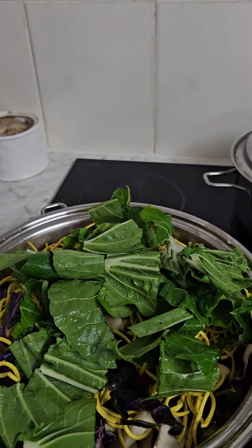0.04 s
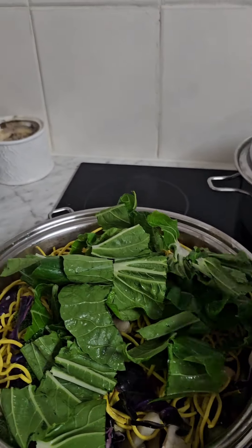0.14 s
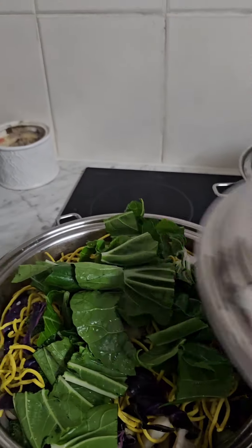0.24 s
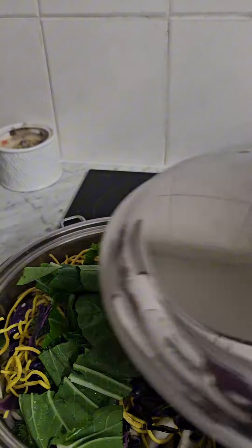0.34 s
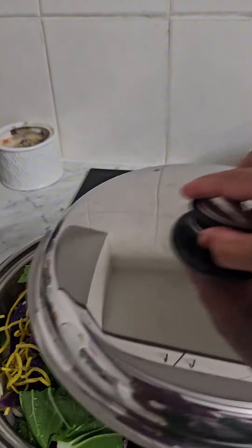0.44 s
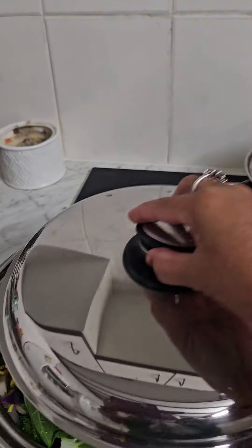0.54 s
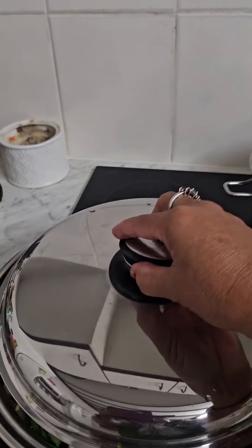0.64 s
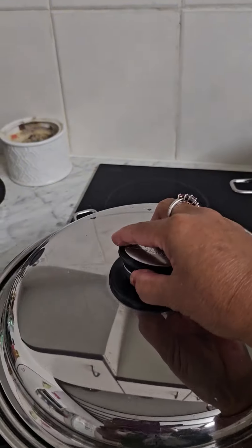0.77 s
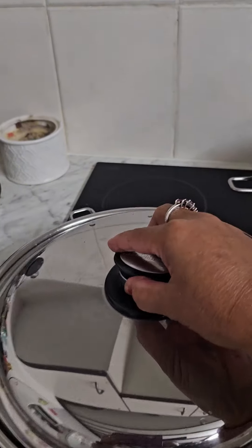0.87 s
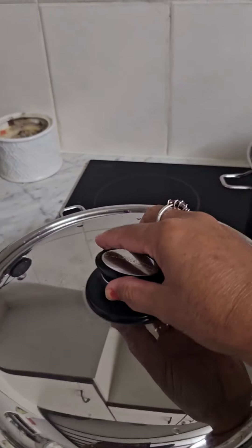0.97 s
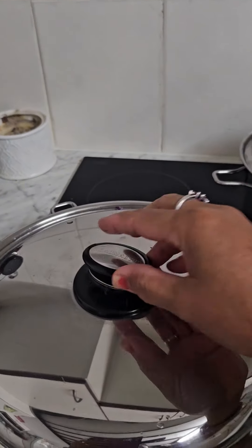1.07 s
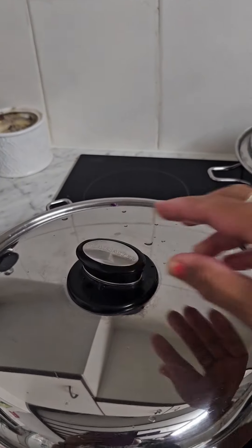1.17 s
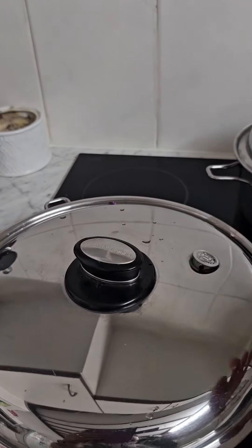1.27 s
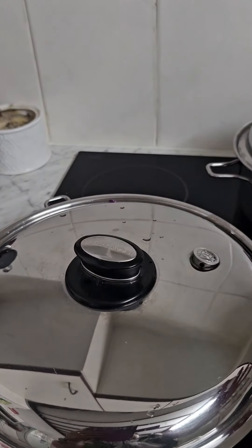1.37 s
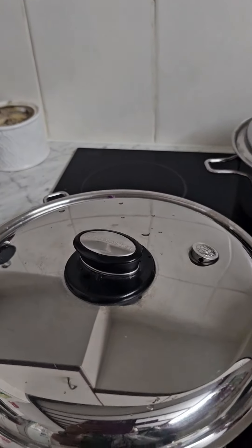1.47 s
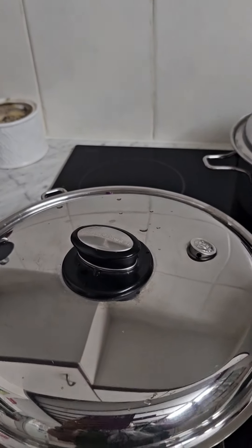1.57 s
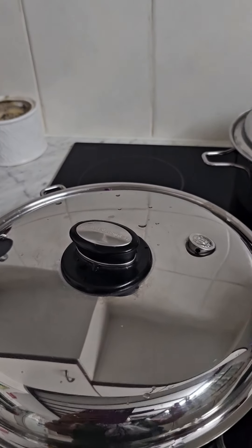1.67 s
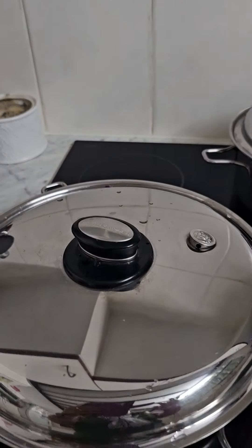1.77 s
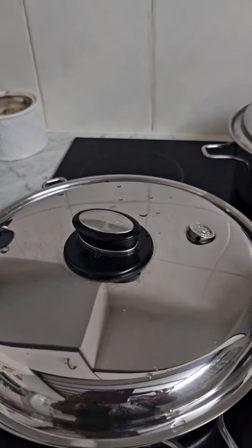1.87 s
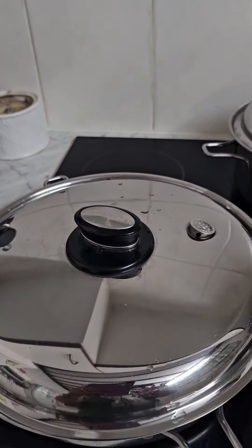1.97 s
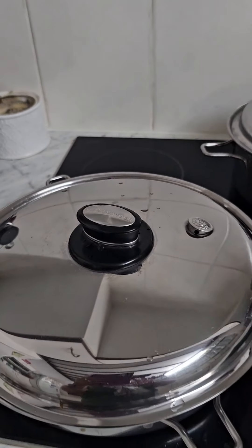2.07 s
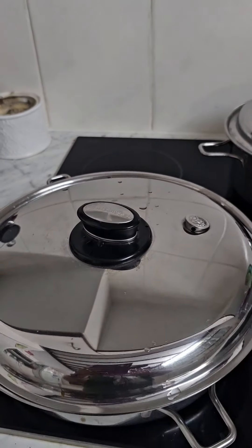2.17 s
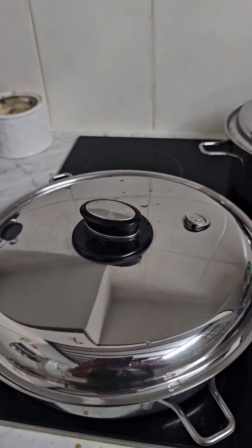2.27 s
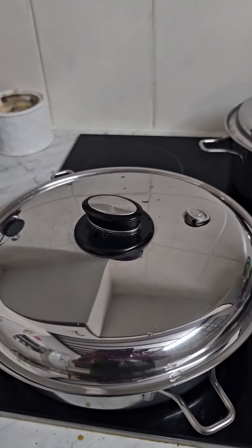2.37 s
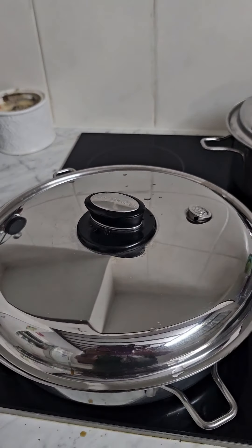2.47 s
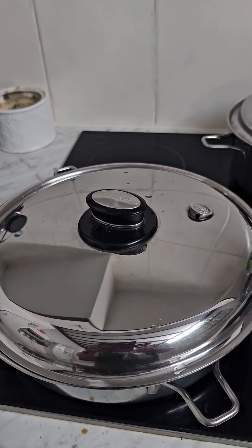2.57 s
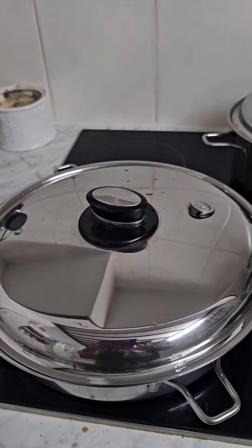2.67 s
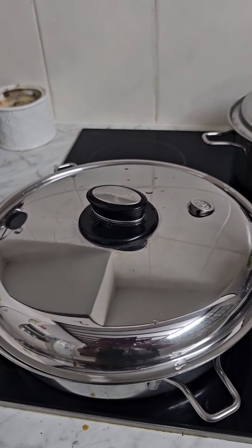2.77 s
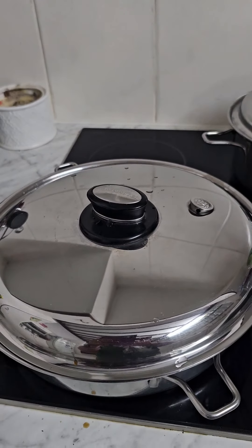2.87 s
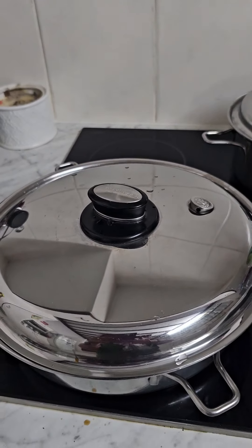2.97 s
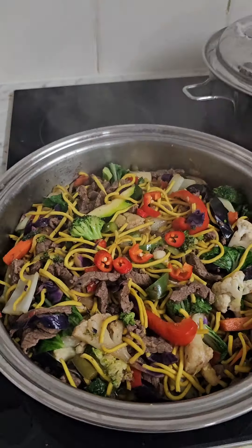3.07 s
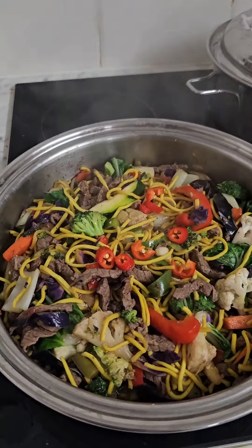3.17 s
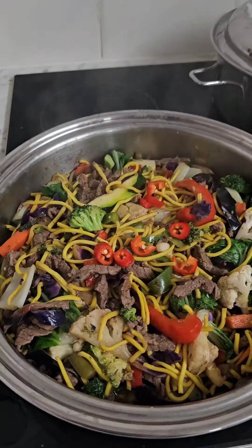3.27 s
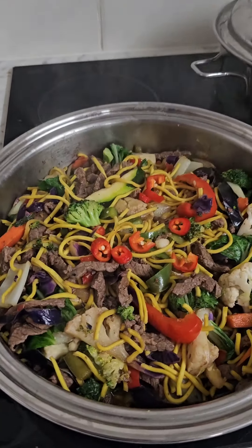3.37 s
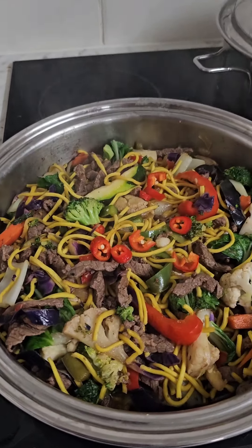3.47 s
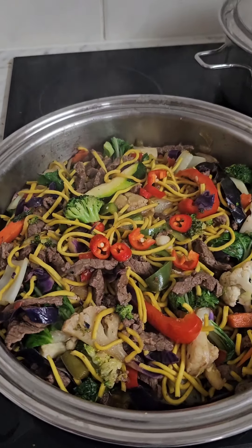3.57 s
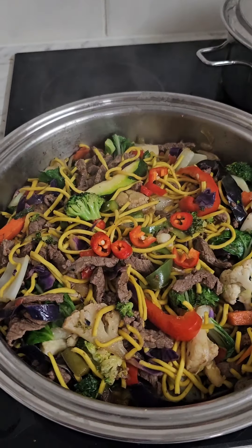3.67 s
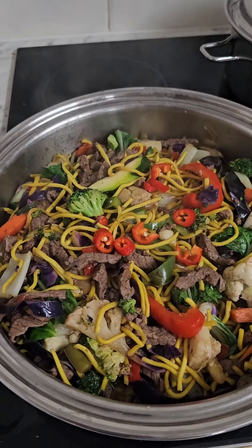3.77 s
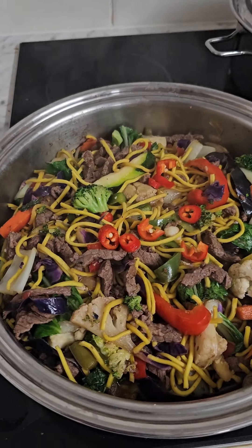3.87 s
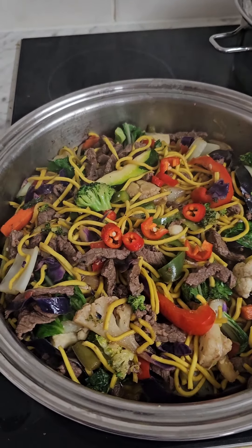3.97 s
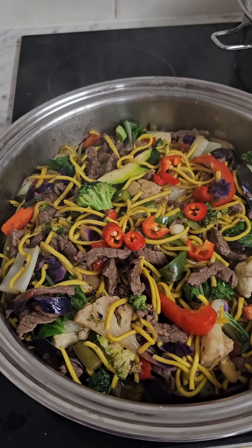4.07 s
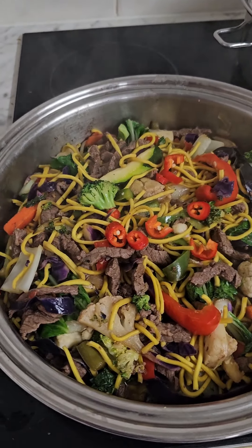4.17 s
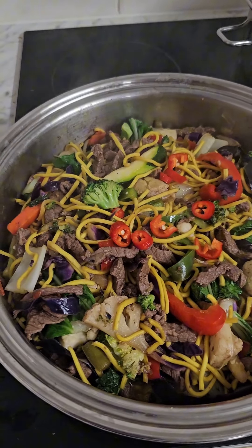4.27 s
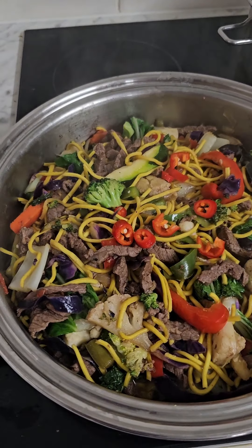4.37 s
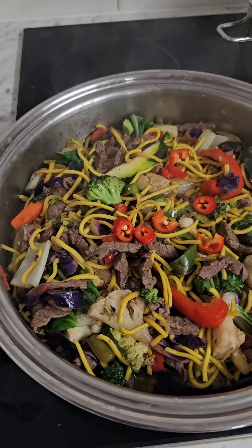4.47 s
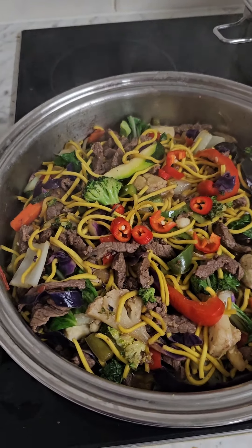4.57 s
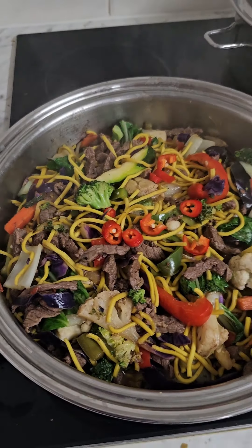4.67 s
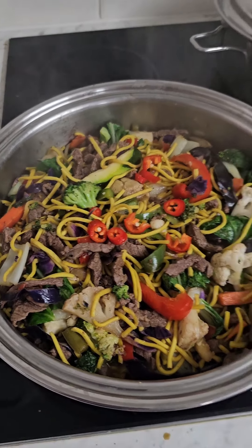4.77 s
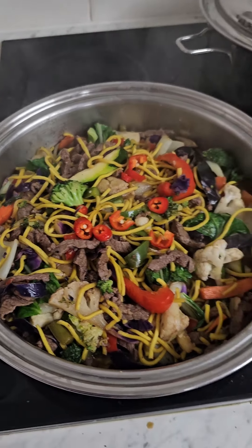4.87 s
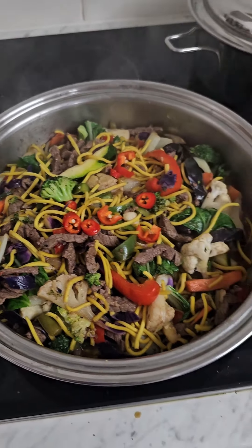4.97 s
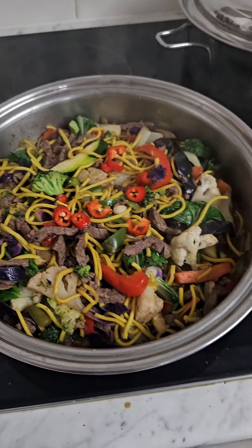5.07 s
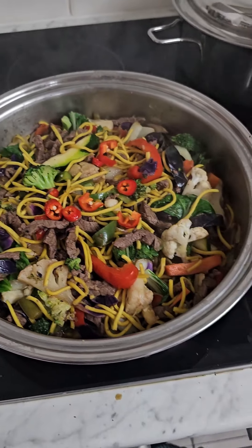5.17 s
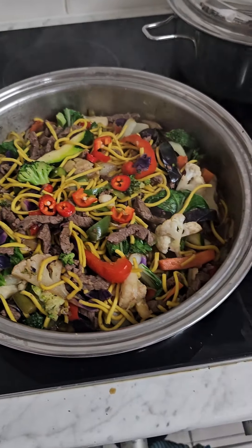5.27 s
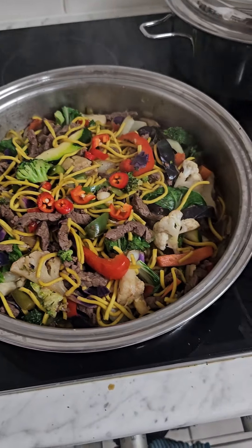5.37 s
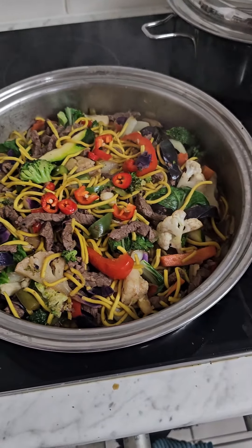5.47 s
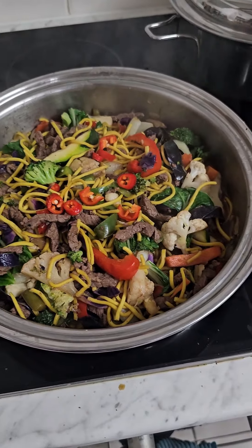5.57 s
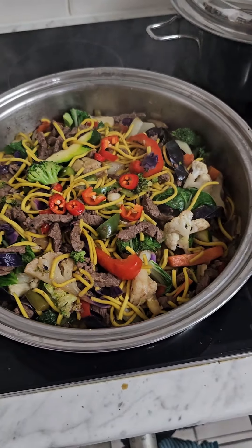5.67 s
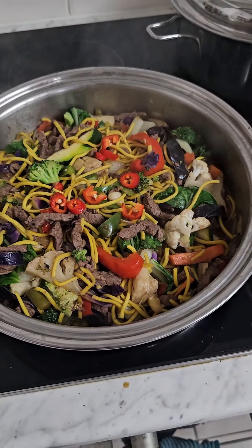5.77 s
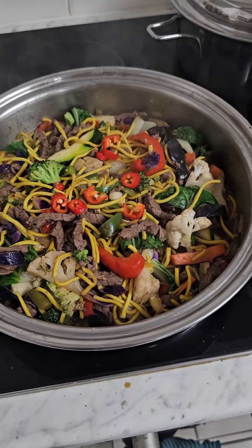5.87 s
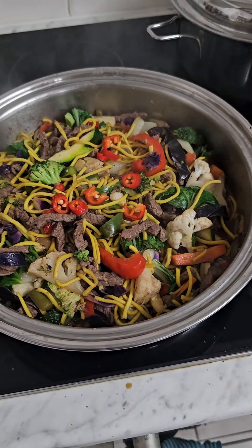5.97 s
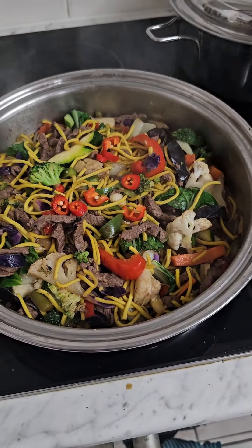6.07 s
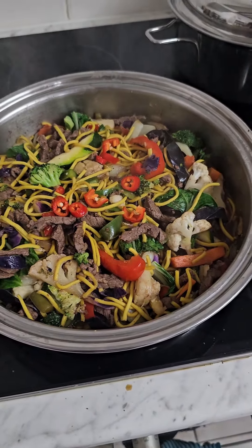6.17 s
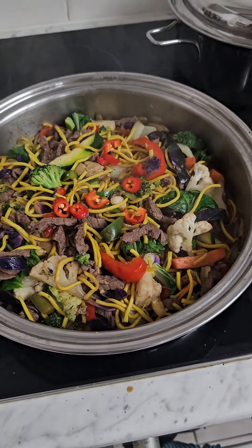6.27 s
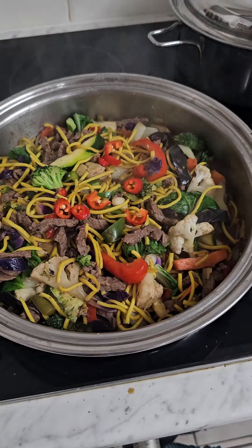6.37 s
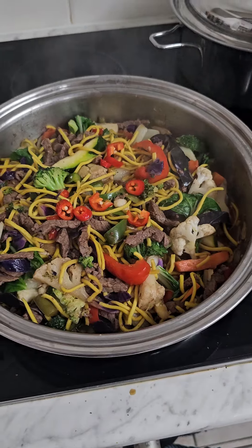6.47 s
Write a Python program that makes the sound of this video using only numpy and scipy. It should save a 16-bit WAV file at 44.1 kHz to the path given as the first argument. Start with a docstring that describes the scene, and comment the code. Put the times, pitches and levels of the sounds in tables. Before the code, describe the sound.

A close, handheld pickup in a small tiled kitchen. From 0 s a wide pan simmers with a soft, prickly hiss over a low hob hum, dimming slightly as a lid approaches; a tiny tick at 0.2. At 0.7 a domed steel lid strikes the rim with a mid-low clank, rocks and chatters brightly around 0.8, then lands again at 0.9 with a duller thud and a brief high ting at 1.0, its ring quickly damped. The sizzle is shut in: a hollow, low murmur remains, with faint hand brushes, soft bumps near 1.3, 1.7, 2.0 and 2.3, and light ticks, the clearest at 2.3. The leaking hiss fades away after 2.5. At 3.1 the open sizzle abruptly returns. From 3.3 to 6.4 steel tongs snap shut eleven times, roughly every 0.3 s, each a bright, short metallic clack with a quick ringing tail and a soft grip bump.

```python
"""A domed steel lid is set on a wide pan of simmering stir-fry: it clanks, rocks and seats, shutting in the
sizzle. Then the sound changes abruptly: the sizzle is open and bright again, and steel tongs clack shut about
three times a second in a small tiled kitchen. Lid and tongs are sums of fading tones, one per way the steel can
ring, with bursts of noise for the contacts. The sizzle and the hollow murmur are coloured noise; small knocks
and faint brushes are short thumps and noise."""
import sys
import numpy as np
from scipy import signal
from scipy.fft import rfft, irfft
from scipy.io import wavfile
from scipy.ndimage import uniform_filter1d

SR = 44100
rng = np.random.default_rng(int(sys.argv[2]) if len(sys.argv) > 2 else 0)


def transcribe(signal):
    """Save signal, clipped to [-1, 1], as a 16-bit WAV file at the path in sys.argv[1]."""
    frames = np.atleast_2d(signal).T
    limited = np.clip(frames, -1, 1)
    pcm = np.round(limited * 32767).astype(np.int16)
    wavfile.write(sys.argv[1], SR, pcm)


N = 287532
T = np.arange(N) / SR  # time [s]
RING = T[:int(.7 * SR)]  # time within one blow [s]
LID_ON_S, SWITCH_S = .72, 3.114  # the sizzle sounds covered between these times, then abruptly open again

# All levels in the tables are relative.
# Tones of the lid on the pan: (pitch [Hz], level [dB], time to fade by 60 dB [s], left minus right [dB])
LID_MODES = [(113, -10, .36, 1), (131, -14, .18, 1), (269, 1, .23, -1), (293, -4, .14, -1),
             (338, -8, .1, 0), (380, -3, .14, 0), (411, -6, .14, 0), (472, -8, .16, -4), (500, -4, .26, 0),
             (556, -10, .26, 4), (570, -10, .22, 4), (692, -11, .22, 7), (816, -13, .2, 4),
             (845, -12, .2, 4), (976, -17, .15, 0), (1075, -13, .19, -1), (1126, -12, .23, -4),
             (1187, -8.5, .37, -7), (1300, -19, .09, -3), (1945, -25, .3, -6), (2186, -35, .35, -3),
             (2864, -33, .52, 0), (3830, -36, .4, 0), (4020, -33, .42, 0), (5070, -22, .26, 0),
             (5115, -24, .18, 0), (5540, -32, .25, 0), (6060, -27, .3, 0), (6525, -25, .25, 0),
             (8350, -32, .25, 0)]
# Rim meets rim: (time [s], level [dB], hardness [dB]); bare steel is above 0, cushioned contact far below
LID_BLOWS = [(.7075, -22.5, 0.5), (.788, -24.5, 3), (.804, -30.5, 12.5), (.822, -33, 12),
             (.834, -41.5, 19.5), (.897, -21, -44), (.910, -31, 0), (.923, -42, 12), (.937, -25.5, -64),
             (1.002, -36, -9.5)]
# Colour of the grit between the rims: (frequency [Hz], level [dB])
SCRAPE_COLOUR = [(300, -7), (600, 10), (1200, 11), (1600, -4.5), (2500, -11), (3500, -9.5), (5000, -6),
                 (6500, -2), (9000, -7), (12000, -5.5), (16000, -8)]
# Tones of the tongs' arms: (pitch [Hz], level [dB], time to fade by 60 dB [s], left minus right [dB])
TONG_MODES = [(1190, -5, .11, -2), (1250, -6, .1, -2), (2080, -9, .07, 0), (2680, -11, .12, 0),
              (3250, -13, .1, 0), (3359, -14, .17, 0), (3890, -8, .08, 0), (4012, -9, .13, 0),
              (4715, -4, .16, 0), (4768, -8, .15, 0), (4822, -9, .15, 0), (5265, -6, .11, 0),
              (5305, -7, .13, 0), (5655, -5, .21, 0), (5691, -6, .2, 0), (5818, -10, .19, 0),
              (6188, -5, .14, 0), (6654, -5, .16, 0), (6720, -2, .19, 0), (7773, 2, .16, 2),
              (7975, -5, .12, 2), (8140, -5, .14, 2), (8412, -8, .13, 2), (8700, -5, .12, 2),
              (8760, -6, .12, 2), (8942, -4, .23, 2), (9760, -6, .12, 2), (9850, -6, .12, 2),
              (10175, -7, .18, 2), (11480, -8, .16, 2), (12860, -8, .15, 2)]
# Tongs snap shut: (time [s], level [dB])
CLACKS = [(3.3318, -22), (3.5788, -21), (3.913, -19.5), (4.2191, -19.5), (4.5309, -21.5), (4.8819, -20),
          (5.1799, -19), (5.5142, -20), (5.8388, -21.5), (6.1503, -21), (6.4399, -19.5)]
# Colour of the bright crack of steel on steel: (frequency [Hz], level [dB])
CRACK_COLOUR = [(300, -3), (1500, -14.5), (3200, -10), (4600, -4), (8200, 0), (9300, -8.5), (12500, -4),
                (16000, -7.5)]
# Sharp ticks around the stove: (time [s], level [dB])
TICKS = [(.213, -52), (1.505, -53.5), (1.659, -44.5), (1.714, -52), (2.166, -50.5), (2.322, -37.5)]
# Colour of one tick: (frequency [Hz], level [dB])
TICK_COLOUR = [(200, 17), (700, 11), (1500, 2.5), (4000, 4), (6600, 2), (7700, 6.5), (9500, -2.5),
               (16000, -2.5)]
# Dull bumps: (time [s], level [dB], pitch they sink towards [Hz])
BUMPS = [(1.322, -33.5, 272), (1.659, -38, 100), (2.023, -46.5, 98), (2.323, -39.5, 89)]
# Colour of simmer and hob with the pan open: (frequency [Hz], level [dB])
OPEN_COLOUR = [(25, -1.5), (60, 2), (110, 5.5), (185, -16.5), (280, 3.5), (370, -11.5), (520, -0.5),
               (640, -9), (800, -2), (970, -12.5), (1300, -8.5), (3000, -19), (8000, -24), (16000, -37)]
# Colour of simmer and hob with the pan covered: (frequency [Hz], level [dB])
COVERED_COLOUR = [(25, -7), (60, 3), (110, -3.5), (175, -24), (285, 1), (335, -10), (390, -3), (500, -13),
                  (630, -24.5), (820, -13.5), (1000, -30), (3000, -37.5), (8000, -44), (16000, -58)]
# Soft brushes of a hand moving away: (middle [s], level [dB], half length [s])
BRUSHES = [(1.547, -62.5, 0.38), (1.978, -56.5, 0.059), (2.198, -67.5, 0.34)]


def lid():
    """The lid lands on one side, then the other, chatters and seats."""
    out = np.zeros((2, N))
    shimmer = overtones(SCRAPE_COLOUR, count=80) * fade(0.24)
    for s, db, hardness_db in LID_BLOWS:
        add(out, s, undb(db) * lid_blow(s, hardness_db, shimmer))
    add(out, 1.003, undb(-17) * lid_ting())
    # the lid sinks home with a falling thud
    add(out, .936, undb(-22) * thump(244, 0.14, bend=.45))

    # once the lid lies flat, the rim damps the ring and its echo
    seated_s, damping_db_per_s = 0.983, 70
    return kitchen(out, wet_db=-6.5, t60=0.46) * undb(-damping_db_per_s * since(seated_s))


def lid_blow(s, hardness_db, shimmer):
    """One touch of the rims: harder contact wakes more treble; hand and food quickly soak up the extra thud."""
    # the upper tones gain 0.6 dB per dB of hardness
    clang_db = -1.5 + hardness_db
    ring_db = 6.5 + 0.6 * hardness_db
    treble_db = -1.5 + 0.6 * hardness_db
    tone = [(110, -1), (280, -1.3), (400, 2 + hardness_db / 12), (550, 0.5 + hardness_db / 4),
            (1100, clang_db), (2000, ring_db), (4000, treble_db)]

    # the extra first swing wanes from blow to blow as the lid settles
    first_thud, settle_s = 1.3, 0.25
    thud = first_thud * np.exp(-(s - LID_BLOWS[0][0]) / settle_s)
    body = ring(LID_MODES, tone, scatter_db=4, detune=0.0011, stagger=1.376)
    body = body * (1 + thud * fade(0.045))

    scrape = noise(SCRAPE_COLOUR, len(RING)) * fade(0.16)
    scrape = scrape * grains(rate=520, spread_db=4.5, size=len(RING))
    bright = undb(-3.0) * scrape + undb(-13.5) * shimmer
    return body + undb(treble_db) * bright


def lid_ting():
    """The last touch of the rim briefly rings its tones near 4 kHz."""
    tone = [(1200, -43), (2800, -6), (4000, 5), (5000, -16), (8000, -21)]
    steel = ring(LID_MODES, tone, scatter_db=3, detune=0.0016, stagger=1.39)
    return steel * fade(0.45)  # on top of each tone's own fading


def tongs():
    """The hand squeezes with a soft bump; then the two tips hit just after one another and the arms ring."""
    steel, grip = np.zeros((2, N)), np.zeros((2, N))
    shimmer = overtones(CRACK_COLOUR, count=130) * fade(0.11)
    second_tip_lag_s, second_tip_db = .0032, -2
    for s, db in CLACKS:
        add(steel, s, undb(db) * tong_tip(shimmer))
        add(steel, s + second_tip_lag_s, undb(db + second_tip_db) * tong_tip(shimmer))

        squeeze_hz = 105 * np.exp(0.081 * rng.standard_normal())
        squeeze = undb(-37.5) * thump(squeeze_hz, 0.072, bend=0.42) + undb(-42.0) * thump(280, 0.12)
        add(grip, s - .044, squeeze)
        add(grip, s, undb(db - 20.5) * thump(290, 0.075) + undb(db - 17.0) * thump(131, 0.05))
    return kitchen(pan(steel, left_db=4.0), wet_db=-4.0, t60=0.24) + grip


def tong_tip(shimmer):
    """One tip strikes: a short crack of noise, ringing arms and a shimmer of high overtones."""
    tone = [(1200, -1.1), (2500, 2.5), (6000, -1), (14000, 2)]
    arms = ring(TONG_MODES, tone, scatter_db=3.0, detune=0.00062, stagger=2.483)
    arms = arms * (1 + 0.58 * fade(0.14))  # the closed tips soak up the first swing
    crack = noise(CRACK_COLOUR, len(RING)) * fade(0.035)
    return undb(-24.5) * arms + undb(-17.0) * shimmer + undb(-6.5) * crack


def knocks():
    """Light knocks: ticks are short bursts of noise, bumps are thumps that sink in pitch."""
    out = np.zeros((2, N))
    for s, db in TICKS:
        tick_fade = fade(0.024) + undb(-0.5) * fade(0.11)
        add(out, s, undb(db) * noise(TICK_COLOUR, len(RING)) * tick_fade)
    for s, db, hz in BUMPS:
        add(out, s, undb(db) * thump(hz, 0.18, bend=140 / hz))  # starts 140 Hz higher
    return kitchen(out, wet_db=-8.0, t60=0.35)


def sizzle():
    """Juices hiss and prickle in the open pan; under the lid a little hiss escapes at the rim, then dies away."""
    open_db, shaded_db, later_db = -49, -4, -47.5
    leak_db, seal_s, seal_db_per_s = -64, 2.47, 90
    lowering_s = 0.8  # the nearing lid shades the sizzle for this long
    lowered = since(LID_ON_S - lowering_s) / lowering_s
    before_db = open_db + shaded_db * lowered ** 2
    covered_db = leak_db - seal_db_per_s * since(seal_s)
    level_db = np.select([T < LID_ON_S, T < SWITCH_S], [before_db, covered_db], later_db)

    hiss = noise(OPEN_COLOUR, N) * undb(0.7 * walk(13))
    prickle = noise([(500, -20), (1600, -9), (4000, -3), (16000, -53)], N)
    prickle = prickle * grains(rate=370, spread_db=6, size=N)
    return pan(hiss + undb(-18.5) * prickle, left_db=2.5) * undb(level_db)


def murmur():
    """The hollow low murmur of the simmer grows under the lid; the landing lid stirs it up for a moment."""
    open_db, under_lid_db, later_db = -56, -48, -61.5
    boom_db, calm_s = 10.5, 0.24
    covered_db = under_lid_db + boom_db * np.exp(-since(LID_ON_S) / calm_s)
    level_db = np.select([T < LID_ON_S, T < SWITCH_S], [open_db, covered_db], later_db)
    return noise(COVERED_COLOUR, N) * undb(1.3 * walk(12)) * undb(level_db)


def rustle():
    """Skin and cloth brush faintly and unevenly; each stroke of noise swells and fades."""
    strokes = sum(undb(db) * np.exp(-((T - s) / half_s) ** 2) for s, db, half_s in BRUSHES)
    cloth = noise([(500, -1), (1500, -5.5), (3500, -4), (7000, -13), (16000, -26.0)], N)
    return cloth * strokes * undb(2 * walk(29.9))


def ring(modes, tone, scatter_db, detune, stagger):
    """Struck steel is a sum of fading tones; each blow weights and detunes them anew."""
    out = 0
    chances = rng.standard_normal((len(modes), 3))
    for k, ((hz, db, t60, left_db), (size, turn, shift)) in enumerate(zip(modes, chances)):
        # the tones start staggered and reach the two ears out of step
        phase = np.array([[1], [-1]]) * turn * apart(hz) - k * stagger
        wave = np.cos(2 * np.pi * hz * (1 + detune * shift) * RING + phase) * fade(t60)
        out = out + pan(wave, left_db) * undb(db + scatter_db * size) * colour(tone, hz)
    return out * (1 - fade(0.0027)) ** 2  # the contact force takes a moment to build up


def overtones(points, count):
    """The crowd of weak, high tones of thin steel, scaled to an average strength (rms) of 1."""
    hz = np.linspace(3500, 16000, count) + rng.normal(0, 50, count)
    size = colour(points, hz) * undb(5.9 * rng.standard_normal(count))
    phase = rng.uniform(0, 2 * np.pi, (count, 2, 1))
    x = sum(a * np.sin(2 * np.pi * f * RING + p) for f, a, p in zip(hz, size, phase))
    return x / x.std()


def thump(hz, t60, bend=.0):
    """A soft, dull knock; with bend, it starts higher and sinks towards its pitch."""
    turns = np.cumsum(hz * (1 + bend * fade(0.082))) / SR
    swell_and_fade = fade(t60) - fade(t60 / 8)
    return np.tile(np.sin(2 * np.pi * turns) * swell_and_fade, (2, 1))


def grains(rate, spread_db, size):
    """Loudness curve of many tiny contacts (rate per second), most weak and a few strong; rms 1."""
    strength = undb(spread_db * np.minimum(rng.exponential(size=size), 4))
    hits = (rng.random(size) < rate / SR) * strength
    envelope = signal.lfilter([1], [1, -np.exp(-1 / (0.0032 * SR))], hits)  # each dies off in a few ms
    return envelope / np.sqrt(np.mean(envelope ** 2))


def noise(points, size):
    """Stereo noise of a given colour, rms 1, with the bass shared by both ears."""
    hz = np.arange(size // 2 + 1) * SR / size
    mid, side = rfft(rng.standard_normal((2, size)))
    both_ears = mid + np.outer([1, -1], apart(hz)) * side
    x = irfft(both_ears * colour(points, hz), size)
    return x / x.std()


def kitchen(x, wet_db, t60):
    """Tiles and worktop send back a short, dense echo."""
    tail = noise([(100, 7.3), (7000, 5.0), (16000, 0.5)], len(RING))
    tail = tail * fade(t60) * (RING > .003)  # the echo starts after 3 ms
    tail /= np.sqrt(np.sum(tail ** 2) / 2)
    return x + undb(wet_db) * signal.fftconvolve(x, tail, axes=1)[:, :N]


def walk(rate):
    """Smooth random wander around 0, with about the given number of new values per second."""
    k = int(SR / rate)
    steps = np.repeat(rng.standard_normal(N // k + 1), k)
    return uniform_filter1d(steps, k)[:N]


def colour(points, hz):
    """Gain of a (frequency [Hz], level [dB]) outline at given frequencies."""
    f, db = np.transpose(points)
    return undb(np.interp(np.log(np.maximum(hz, 1)), np.log(f), db))


def apart(hz, corner_hz=1400):
    """How unlike the two ears are: near 0 in the bass, near 1 in the treble."""
    return hz / np.hypot(hz, corner_hz)


def pan(x, left_db):
    """Lean a sound to the left by making the left ear louder than the right."""
    return x * undb(np.array([[left_db], [-left_db]]) / 2)


def fade(t60):
    """Steady dying away over one blow: down by 60 dB after t60 seconds."""
    return np.exp(-np.log(1000) * RING / max(t60, 1e-3))


def undb(db):
    """Decibels to gain."""
    return 10 ** (np.asarray(db) / 20)


def since(s):
    """Seconds gone by since time s, 0 before it."""
    return np.maximum(T - s, 0)


def add(out, s, x):
    """Mix a stereo sound in at time s [s]."""
    i = int(s * SR)
    out[:, i:i + x.shape[1]] += x[:, :N - i]


def scene():
    """Everything at the stove."""
    return lid() + tongs() + knocks() + sizzle() + murmur() + rustle()


def record(dry):
    """The phone thins the deepest bass and cuts the top."""
    bass_cut = signal.butter(2, 28, "high", fs=SR, output="sos")
    top_cut = signal.ellip(10, .2, 70, 15750, fs=SR, output="sos")
    return signal.sosfilt(top_cut, signal.sosfilt(bass_cut, dry))


dry = scene()
out = record(dry)
transcribe(out)
```